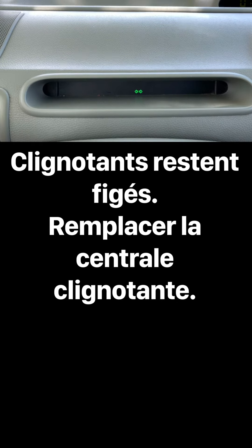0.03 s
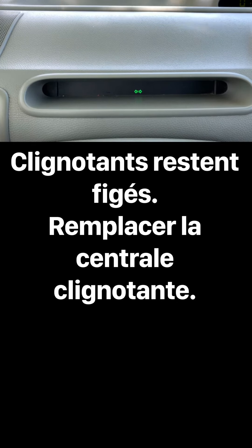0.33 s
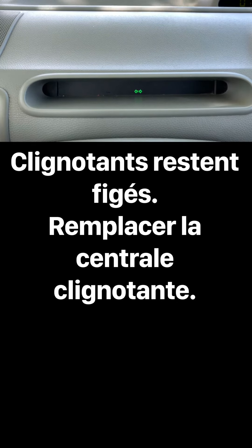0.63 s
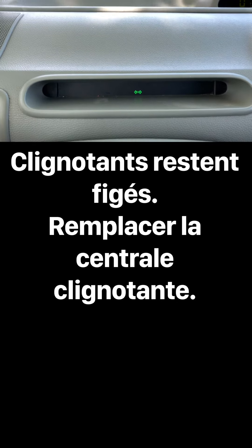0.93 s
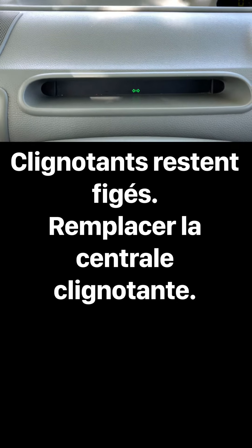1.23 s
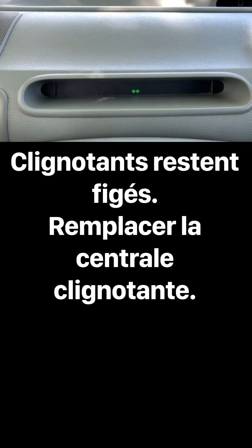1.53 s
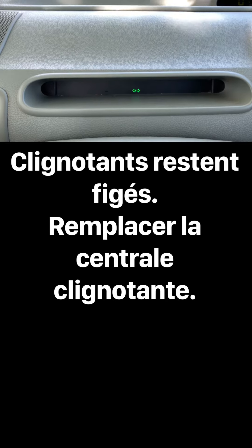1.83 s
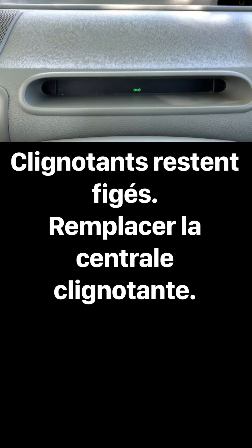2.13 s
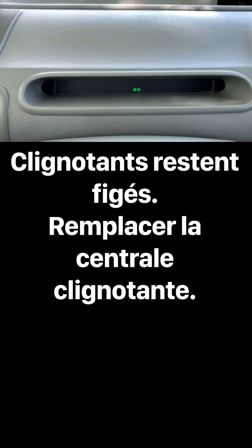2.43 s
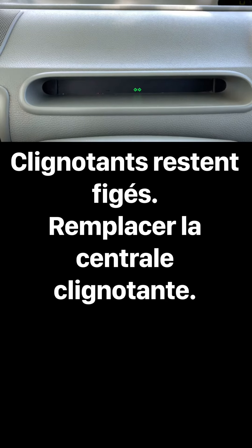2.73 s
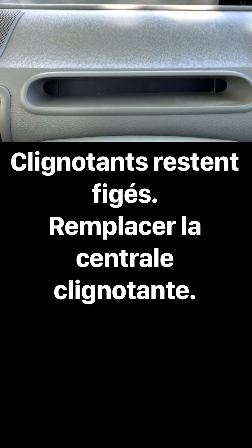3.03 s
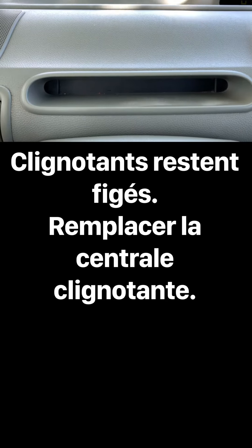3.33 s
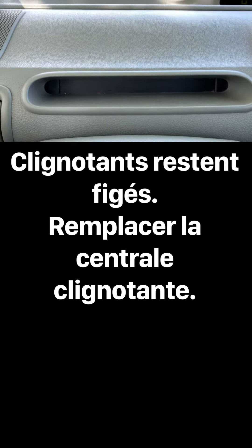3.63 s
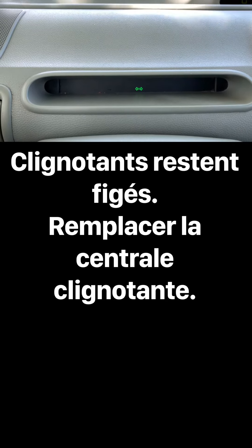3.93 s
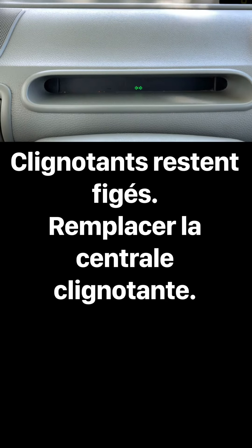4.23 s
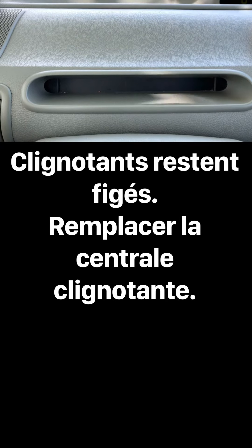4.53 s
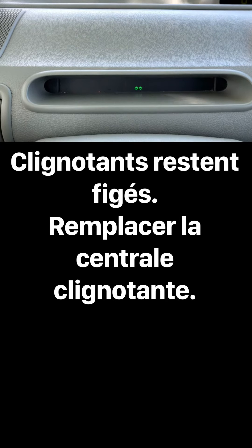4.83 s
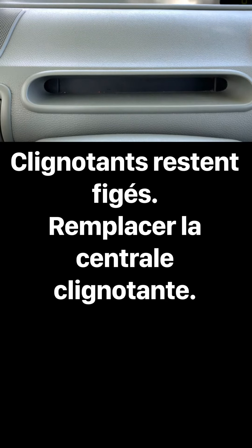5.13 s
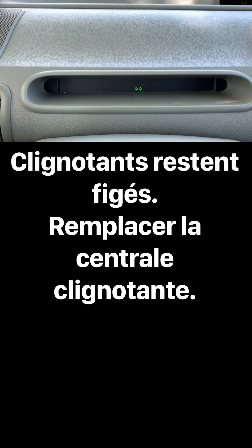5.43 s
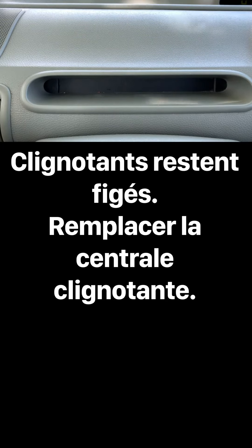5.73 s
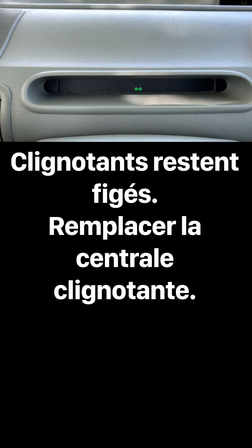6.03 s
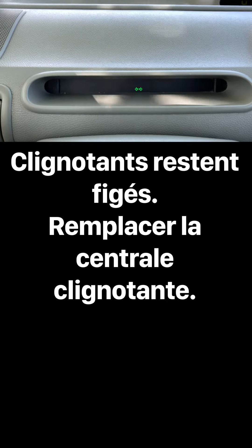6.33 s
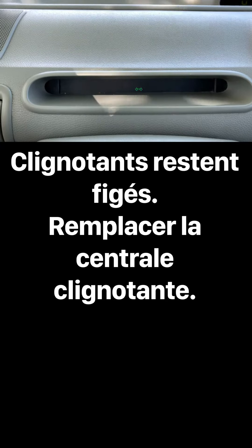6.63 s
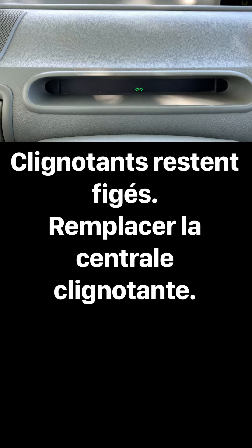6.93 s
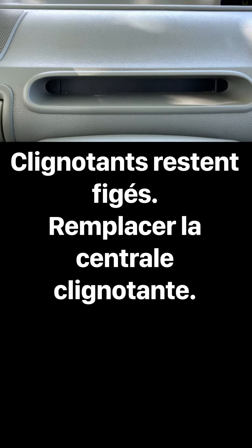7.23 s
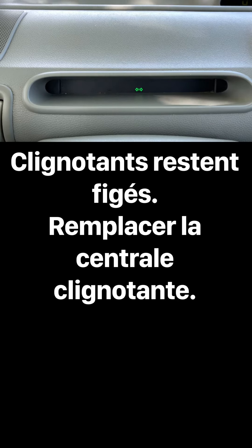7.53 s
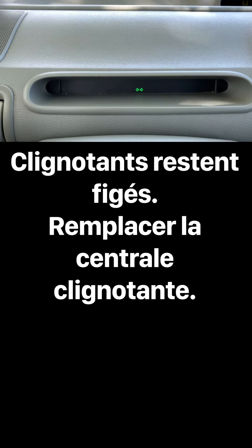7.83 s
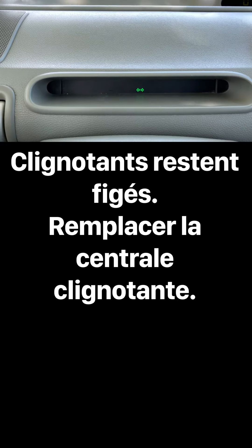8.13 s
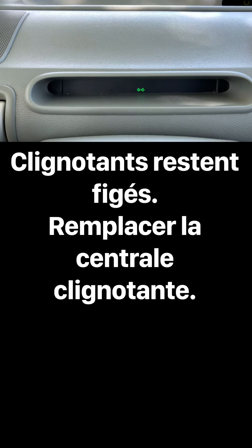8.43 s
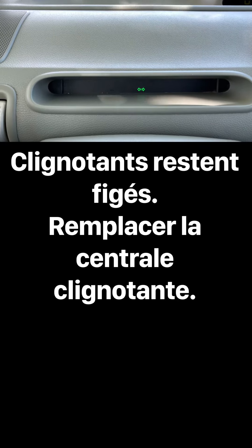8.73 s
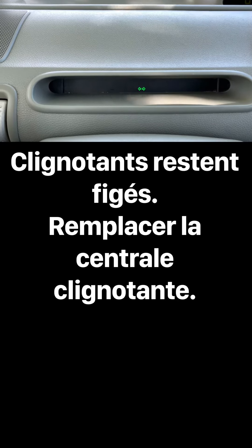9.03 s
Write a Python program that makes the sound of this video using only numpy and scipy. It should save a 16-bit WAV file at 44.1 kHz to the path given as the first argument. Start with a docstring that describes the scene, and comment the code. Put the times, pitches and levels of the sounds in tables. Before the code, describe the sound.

Inside a parked car, an engine idles with a low hum and a faint belt swish. A plastic dashboard button slides briefly and snaps loudly, then snaps again about a second later. A quieter flasher relay ticks on and off five times, clicks once more and stops, leaving the idle. A few soft trim knocks fall in between. Everything is heard from the driver's seat, close and dry.

```python
"""A dashboard hazard button slides in and snaps, then snaps again about a second later, in a parked car.
Behind the plastic the flasher relay ticks on and off five times, pulls in once more and sticks.
Small trim knocks fall in between; each hit rings plastic or metal, and the padded cabin keeps it short.
Underneath, a four-cylinder engine idles: a low boom, a fan hum, faint firing ticks, a swishing belt."""
import sys
import numpy as np
from scipy import signal
from scipy.fft import rfft, irfft
from scipy.io import wavfile
from scipy.ndimage import uniform_filter1d

SR = 44100
rng = np.random.default_rng(int(sys.argv[2]) if len(sys.argv) > 2 else 0)


def bounce(signal):
    """Save signal as a 16-bit WAV file at the path given by the first command-line argument."""
    frames = np.transpose(np.atleast_2d(signal))
    limited = np.clip(frames, -1, 1)
    pcm = np.round(limited * 32767).astype(np.int16)
    wavfile.write(sys.argv[1], SR, pcm)


N = 404397

# stereo image of the cabin, how alike the two sides are: freq_hz, correlation
STEREO_LIKENESS = [(60, 0.92), (200, .9), (380, 0.56), (700, 0.38), (1300, 0.77), (2500, 0), (4500, 0),
                   (8000, 0.92), (16000, 1)]
# pan of the dashboard, which radiates its low mids to the left: freq_hz, left_minus_right_db
DASH_PAN = [(130, 7), (230, 1), (400, 0.5), (600, 11), (900, 1.5), (1400, 3.5), (2200, -1.5), (5000, -1),
            (9000, -0.5)]

# tones of the engine boom: multiple_of_firing_rate, rms_level_db
ENGINE_ORDERS = [(1, -48.5), (2, -39.5), (2.25, -54), (2.5, -50), (3, -47), (4, -57.5), (5, -52),
                 (6, -51.5), (10, -60.5)]
# bed of rumble and air in the cabin: freq_hz, level_db_per_hz
CABIN_EQ = [(20, -84), (40, -68.5), (62, -60.5), (90, -66.5), (130, -65.5), (175, -65), (225, -74),
            (350, -79), (750, -87), (1250, -95.5), (1750, -106), (2200, -112), (4500, -117), (8000, -121),
            (11500, -120), (16000, -124)]
# air resonances and dead spots of the cabin: freq_hz, width_hz, gain_db
CABIN_PEAKS = [(269, 45, 6), (370, 21, -7.5), (432, 45.7, 13), (665, 70, 3.5), (749, 110, 8.5),
               (861.4, 92, -9.5), (1006, 230, 4), (1229, 73, 5), (1510, 260, -4.5), (1610, 36, 16.5)]
# muffled swish of the belt: freq_hz, gain_db
BELT_EQ = [(500, -0.5), (720, 11.5), (900, -4.5), (1200, -3.5), (1380, -18.5), (1600, -2.5), (1850, -8.5),
           (2200, -19), (3200, -20), (4400, -29), (7000, -45.5)]
# resonances in that swish: freq_hz, width_hz, gain_db
BELT_PEAKS = [(1465, 20, 2.77), (1550, 70, 4), (1830, 60, 4), (2113, 62, 5), (2920, 70, 7),
              (3120, 120, 3.6)]
# engine ticks coming through the bulkhead: freq_hz, gain_db
ENGINE_TICK_EQ = [(900, -19.5), (1600, -0.5), (2300, -0.5), (3200, -3.5), (4600, -6.5), (8000, -32)]
# metal parts that ring with them: freq_hz, width_hz, gain_db
ENGINE_TICK_PEAKS = [(1587, 46, 6.5), (1850, 61, 6), (2540, 91, 9), (2850, 150, 7), (3052, 62, 6.5),
                     (3677, 140, 5)]

# knocks of the button and trim: start_s, level_db, treble_edge_db, t60_s, dash_thud_db, hollow_panel_db
KNOCKS = [(0.891, -47, -6, 0.015, -60, -50), (1.0188, -45, 15, 0.033, -45, -40.5),
          (2.6874, -49, -15, 0.072, -61, -46), (2.752, -47, -6, 0.025, -39, -39.5),
          (3.0372, -45, -7, 0.087, -44.5, -47), (3.6762, -40, 9, 0.034, -45, -52),
          (3.8839, -43.5, -13, 0.11, -34.5, -41), (3.9077, -38.5, -19, 0.028, -32, -44),
          (7.3465, -45, -20, 0.047, -39, -43), (7.4215, -57, -3, .05, -50, -43),
          (7.4466, -45, 2, 0.041, -31, -34)]
# dense ring of a knock: freq_hz, gain_db
KNOCK_EQ = [(200, 5.5), (700, 3), (1300, 7.5), (2300, 0.5), (3300, -1), (4500, -4.5), (7000, -12.5),
            (11000, -18.5), (16000, -25.5)]
# a faint brush, then the button sliding in its guide: peak_s, level_db, attack_s, hold_s, fade_db_per_s
RUBS = [(0.95, -63, 0.097, 0.0052, 187), (2.588, -43, 0.011, 0.032, 248)]
# hiss of the sliding button: freq_hz, gain_db
SLIDE_EQ = [(900, -20), (1500, -11.5), (1850, 1.5), (2700, -2.5), (3300, -9), (4600, -4), (5400, -11.5),
            (7400, -7), (8200, -14), (10500, -6), (12300, -8), (13600, -15.5), (15500, -12)]
# resonances of the rubbed plastic: freq_hz, width_hz, gain_db
SLIDE_PEAKS = [(1983, 250, 3), (2730, 200, 5.5), (3773, 200, 8.5), (4530, 300, 7), (7350, 300, 4),
               (9600, 250, 5.5)]

# latch contacts within the press snap and the release snap: offset_ms, gain_db
PRESS_BOUNCES = [(-6.5, -20.5), (-2, -4.5), (3, -2.5), (1, -5), (15.5, -3), (13.5, -2), (22.5, -10.5)]
RELEASE_BOUNCES = [(-1, -25.5), (1.2, 8.5), (1.73, -10.5)]
# dense ring of the button in its panel: freq_hz, press_gain_db, release_gain_db
BUTTON_EQ = [(90.8, -1, 1), (169.6, 0.5, 7), (364, -5.5, -2), (646, 0, 1.5), (934.3, -6, -19.5),
             (1381, -2.5, -5.5), (2090, -1, 2.5), (3006, -3, -8.5), (4364, -0.5, -4.5), (5400, -9.5, -10.5),
             (7100, -9.5, -5.5), (9930, -12.5, -10.5), (13600, -16, -13.5), (15470, -20.5, -13)]
# clear modes of the button and dashboard: pitch_hz, t60_s, press_gain_db, release_gain_db
BUTTON_MODES = [(133.4, 0.25, -3, 3.5), (175, 0.12, -11, 0), (225.3, 0.085, 3, 1), (527.2, 0.065, -1.5, -9),
                (630, 0.026, -3.5, -7), (697, 0.024, -1.5, 5.5), (751.6, 0.11, -4.5, -8.5),
                (1206.5, .06, -8.5, -15.5), (1270, 0.067, -0.5, -11), (1449, .07, -4.5, -18),
                (1764, .065, -10, -11.5), (2016, .06, -3, -13.5), (2135, .055, -18, -3),
                (2180, 0.047, -3.5, -4), (2452, 0.082, -9.5, -9.5), (2821, 0.093, -1, -16),
                (3110, 0.08, -13, -13), (3262, .07, -10, -13), (3660, .06, -5, -5.5),
                (4202, .065, -6, -24.5), (4336, 0.071, -5, -14), (4470, 0.053, -7.5, -13),
                (4700, 0.069, -10.5, -8.5), (5700, 0.09, -9.5, -21), (6503, 0.066, -20, -9),
                (7135, .03, -14, -1.5)]
# hard crack as the latch lets go: freq_hz, gain_db
CRACK_EQ = [(1000, -17.5), (4000, -12.5), (7000, 0), (11000, 2.5), (15500, -6)]

# the relay pulls its armature in, lamps on: start_s, level_db
PULL_INS = [(3.6437, -36), (4.5708, -38), (5.2057, -37.5), (5.9686, -38), (6.6169, -37), (7.2963, -37)]
# the relay lets go, lamps off: start_s, level_db
DROP_OUTS = [(4.2789, -38.5), (4.911, -38.5), (5.674, -39.5), (6.3646, -39.5), (7.0301, -39.5)]
# armature contacts within one pull-in and one drop-out: offset_ms, gain_db
PULL_BOUNCES = [(-5, -10.5), (1.2, -6), (4.5, -17.5)]
DROP_BOUNCES = [(-4.5, -4.5), (6, -10), (15, -4), (-2, -1)]
# dense ring of the relay case: freq_hz, pull_gain_db, drop_gain_db
RELAY_EQ = [(498, -8, 7.5), (910, -2.5, 5), (1490, -14.5, -1.5), (3120, -7.5, -1.5), (4050, -16, -13),
            (4890, -12, -11), (5910, -12, -7), (6700, -14.5, 6), (7800, -7.5, -24.5), (9100, -23, -14),
            (10730, -12, -8), (13140, -6.5, -4), (14380, -20, -22), (15430, -21.5, -10)]
# clear modes of the relay: pitch_hz, t60_s, pull_gain_db, drop_gain_db
RELAY_MODES = [(787, 0.084, -1.5, -19), (836, 0.091, -6.5, 6.5), (987, .1, -12.5, -18),
               (1094, 0.079, -10, 1), (1200, 0.086, -9.5, -2), (1250, 0.08, -8, -1), (1526, 0.045, -23, -7),
               (2000, .05, -20, -14), (2410, 0.062, -12, -8), (2739, .04, -6, -16), (2788, 0.091, -2, 4),
               (2840, 0.047, -18, -26), (3265, 0.055, -9.5, -12), (3600, .05, -4, -18),
               (3646, 0.1, -3.5, -3), (4820, .05, -11, -25), (5980, 0.07, -5.5, -8),
               (6040, 0.066, -6.5, 14.5), (6350, .05, -11.5, -8), (6555, .05, -14.5, -2),
               (6970, 0.041, -10.5, 4), (7410, .04, -10.5, -14), (7980, .045, -3, 2.5), (8462, .04, -9, 2),
               (8950, .04, -1, -8), (11547, 0.032, -2.5, -11), (12200, .04, -2, 0), (13700, .04, 3, -2),
               (13030, 0.033, 3, -9)]

FIRING_HZ = 25.19
LEFT_LAG_S = .000185
PRE_ROLL_S = .008  # room for contacts that land ahead of a hit's cue
HIT_TIME_S = np.arange(SR // 4) / SR - PRE_ROLL_S


def undb(db):
    """Decibels to gain."""
    return 10 ** (np.asarray(db) / 20)


def unit(x):
    """Scale to unit energy."""
    return x / np.sqrt(np.sum(x ** 2))


def curve(table, hz, column=1):
    """A table column drawn as a curve over log frequency."""
    table = np.asarray(table, float)
    return np.interp(np.log(np.maximum(hz, 1)), np.log(table[:, 0]), table[:, column])


def bells(peaks, hz):
    """Boost or cut in dB from a set of resonances."""
    return sum(db / (1 + (2 * (hz - centre) / width) ** 2) for centre, width, db in peaks)


def drift(rate_hz):
    """Smooth random modulation with a spread near 1."""
    step = int(SR / rate_hz)
    return uniform_filter1d(np.repeat(rng.standard_normal(N // step + 1), step), step)[:N]


def decay(t, rise_s, t60):
    """An envelope that builds from t = 0 and dies away."""
    t = np.maximum(t, 0)
    return (1 - np.exp(-t / rise_s)) * np.exp(-np.log(1000) * t / t60)


def stereo_spectrum(size):
    """Frequencies and spectra of mid/side white noise, the left channel a touch late."""
    hz = np.arange(size // 2 + 1) * SR / size
    mid, side = rfft(rng.standard_normal((2, size)))
    alike = np.clip(curve(STEREO_LIKENESS, hz), -1, 1)
    mid, side = mid * np.sqrt((1 + alike) / 2), side * np.sqrt((1 - alike) / 2)
    return hz, np.array([(mid + side) * np.exp(-2j * np.pi * hz * LEFT_LAG_S), mid - side])


def shaped_noise(eq, peaks):
    """Stereo noise through an EQ curve and its resonances, at unit rms."""
    hz, spectrum = stereo_spectrum(N)
    noise = irfft(spectrum * undb(curve(eq, hz) + bells(peaks, hz)), N)
    return noise / noise.std()


def dash_pan(hz):
    """Left and right gain of a dashboard sound."""
    return undb(curve(DASH_PAN, hz) * np.array([[1], [-1]]) / 2)


def place(out, cue_s, db, hit):
    """Drop a hit on its cue, with its loudest 2 ms at the given level."""
    start = int((cue_s - PRE_ROLL_S) * SR)
    loudest = np.sqrt(uniform_filter1d(np.mean(hit ** 2, axis=0), SR // 500).max())
    out[:, start:start + hit.shape[1]] += hit * undb(db) / loudest


def dense_ring(eq, bounces, t60, tail_db, tail_t60, column=1):
    """Countless overlapping modes: a crack and a cabin tail per contact, with t60s given at 3 kHz."""
    hz, spectrum = stereo_spectrum(len(HIT_TIME_S))
    gain = undb(curve(eq, hz, column))
    dulling_db_per_ms = 0.12  # later contacts are softer and lose their treble
    out = 0
    for centre in np.geomspace(90, 16000, 32):
        band_gain = gain * (np.abs(np.log2((hz + 1) / centre)) < 1 / 8)  # a quarter octave wide
        band = irfft(spectrum * band_gain, len(HIT_TIME_S))
        stretch, rise_s = (3000 / centre) ** .25, 0.00036 + 0.66 / centre  # lows bloom late and hang on
        treble_share = curve([(3000, 0.053), (10000, 0.95)], centre)
        power = 0
        for ms, db in bounces:
            t = HIT_TIME_S - ms / 1000
            strength = undb(db - dulling_db_per_ms * ms * treble_share)
            crack = decay(t, rise_s, t60 * stretch)
            tail = undb(tail_db) * decay(t, rise_s, tail_t60 * stretch)
            power += strength ** 2 * (crack ** 2 + tail ** 2)
        out += unit(band * np.sqrt(power)) * np.linalg.norm(band_gain) * dash_pan(centre)
    return unit(out)


def mode_rings(modes, build_cycles):
    """One decaying sine per mode; reflections put left and right out of step."""
    rings = []
    for (hz, t60, *_), (phase, skew) in zip(modes, rng.uniform(-np.pi, np.pi, (len(modes), 2))):
        alike = curve(STEREO_LIKENESS, hz)
        phases = phase + np.array([[-2 * np.pi * hz * LEFT_LAG_S * alike], [.7 * skew * (1 - alike) ** 2]])
        envelope = decay(HIT_TIME_S, 0.00073 + build_cycles / hz, t60)
        rings.append(unit(np.sin(2 * np.pi * hz * HIT_TIME_S + phases) * envelope * dash_pan(hz)))
    return np.array(rings)


def clear_ring(modes, column, build_cycles):
    """The pitched body of a hit: an object's modes sounding together after one blow."""
    gains = undb(np.array(modes)[:, column])
    return unit(np.tensordot(gains, mode_rings(modes, build_cycles), axes=1))


def idle():
    """Engine orders and a fan boom through the body; the cabin noise throbs with the firings."""
    t = np.arange(N) / SR
    firing_phase = 2 * np.pi * np.cumsum(FIRING_HZ * (1 + .003 * drift(1.465))) / SR
    skew_rad = .12 * np.array([[-1], [1]])  # the boom reaches the right side first
    fan_hz, fan_rms_db = 68.76, -42
    boom = undb(fan_rms_db + 1.383 * drift(3.052)) * np.sin(2 * np.pi * fan_hz * t + skew_rad)
    for multiple, db in ENGINE_ORDERS:
        gain = undb(db + 2.2 * drift(10))
        boom += gain * np.sin(multiple * firing_phase + skew_rad + rng.uniform(0, 2 * np.pi))
    hz, spectrum = stereo_spectrum(N)
    cabin = spectrum * undb(curve(CABIN_EQ, hz) + bells(CABIN_PEAKS, hz)) * np.sqrt(SR / 2)
    # the clatter sits mostly in the mids, each octave swelling on its own
    clatter_share = curve([(150, 0.54), (400, 1), (3000, 1), (7000, 0.061)], hz)
    steady = irfft(cabin * (1 - clatter_share), N)
    throb = undb(1.5 * np.sin(2 * firing_phase) + 0.86 * np.sin(3 * firing_phase) + 0.78 * drift(9))
    octave = np.round(np.log2(np.clip(hz, 250, 4000) / 250))
    clatter = sum(undb(0.894 * drift(12)) * irfft(cabin * clatter_share * (octave == k), N)
                  for k in np.unique(octave))
    lean_left = undb([[.6], [-.6]])
    return np.sqrt(2) * boom + steady + lean_left * throb * clatter


def belt(turn_s=.2885, first_swish_s=.13, swish_db=-59, dip_db=4):
    """The drive belt swishes once a turn, muffled by the bulkhead."""
    t = np.arange(N) / SR
    swish = shaped_noise(BELT_EQ, BELT_PEAKS)
    dip = np.sin(np.pi * (t - first_swish_s) / turn_s) ** 2
    return swish * undb(swish_db - dip_db * dip + 0.2 * drift(18))


def engine_ticks(gain_db=-72, flutter_db=2.5, swell_db=1.2):
    """Each firing leaks through the bulkhead as a faint metallic tick, uneven and coming in waves."""
    since_firing_s = np.arange(N) / SR % (1 / FIRING_HZ)
    rattle = shaped_noise(ENGINE_TICK_EQ, ENGINE_TICK_PEAKS)
    gain = undb(gain_db + flutter_db * drift(28) + swell_db * drift(3.2))
    return rattle * decay(since_firing_s, rise_s=.003, t60=.12) * gain


def trim_knocks(plastic_ring_db=-10.5):
    """Light knocks, dull or sharp, each layered with plastic ring, hollow panel and dashboard thud."""
    out = np.zeros((2, N))
    hz, eq_db = np.transpose(KNOCK_EQ)
    dash = [mode for mode in BUTTON_MODES if mode[0] < 400]
    panel = [mode for mode in BUTTON_MODES if 400 <= mode[0] < 1000]
    plastic = [mode for mode in BUTTON_MODES if 1000 <= mode[0] < 3000]
    for start_s, db, edge_db, t60, thud_db, panel_db in KNOCKS:
        eq = np.column_stack([hz, eq_db + curve([(2500, 0.0039), (9000, edge_db)], hz)])
        place(out, start_s, db, dense_ring(eq, [(0, 0)], t60=t60, tail_db=-17.5, tail_t60=0.21))
        place(out, start_s, db + plastic_ring_db, clear_ring(plastic, column=2, build_cycles=2.5))
        place(out, start_s, panel_db, clear_ring(panel, column=2, build_cycles=1.8))
        place(out, start_s, thud_db, clear_ring(dash, column=3, build_cycles=1.6))
    return out


def button_slide(attack_range_db=21, treble_fade_ratio=1.5, grain_hz=440):
    """Plastic rubs on plastic: a grainy rasp rings the button, swells, holds and dulls as it fades."""
    t = np.arange(N) / SR
    hz, spectrum = stereo_spectrum(N)
    spectrum *= undb(curve(SLIDE_EQ, hz) + bells(SLIDE_PEAKS, hz))
    rasp = irfft(spectrum, N)
    treble = irfft(spectrum * curve([(5000, 0.0041), (9000, 0.9)], hz), N)
    out = 0
    for peak_s, db, attack_s, hold_s, fade_db_per_s in RUBS:
        swell_db = attack_range_db * np.minimum(t - peak_s, 0) / attack_s
        fade_db = fade_db_per_s * np.maximum(t - peak_s - hold_s, 0)
        fading = (rasp - treble) * undb(-fade_db) + treble * undb(-treble_fade_ratio * fade_db)
        out += undb(db + swell_db) * fading
    return out / rasp.std() * undb(drift(grain_hz))


def dry_tick():
    """One tiny tick, left of centre, with no ring at all."""
    out = np.zeros((2, N))
    snap = decay(HIT_TIME_S, rise_s=.00001, t60=0.00057)
    place(out, cue_s=1.387, db=-51.5, hit=np.array([snap, 0.64 * snap]))
    return out


def button_snaps(press_ring_db=0.5, release_ring_db=2.5, crack_db=-3):
    """The latch snaps twice and shakes the dashboard panel; it lets go with a hard, bright crack."""
    out = np.zeros((2, N))
    press = dense_ring(BUTTON_EQ, PRESS_BOUNCES, t60=0.062, tail_db=-31, tail_t60=0.2, column=1)
    release = dense_ring(BUTTON_EQ, RELEASE_BOUNCES, t60=0.055, tail_db=-30, tail_t60=.22, column=2)
    release += undb(crack_db) * dense_ring(CRACK_EQ, [(0.0013, 0)], t60=0.027, tail_db=-34, tail_t60=0.1)
    press += undb(press_ring_db) * clear_ring(BUTTON_MODES, column=2, build_cycles=2.2)
    release += undb(release_ring_db) * clear_ring(BUTTON_MODES, column=3, build_cycles=4)
    place(out, cue_s=2.9005, db=-8.5, hit=press)
    place(out, cue_s=3.7755, db=-10, hit=release)
    return out


def flasher_relay(mode_spread_db=2.3):
    """Tick and tock: each armature stroke rings the same modes in a new mix, with some fresh rattle."""
    out = np.zeros((2, N))
    tick = lambda: dense_ring(RELAY_EQ, PULL_BOUNCES, t60=0.0032, tail_db=-8, tail_t60=0.1, column=1)
    tock = lambda: dense_ring(RELAY_EQ, DROP_BOUNCES, t60=0.052, tail_db=12, tail_t60=0.1, column=2)
    _, _, pull_db, drop_db = np.transpose(RELAY_MODES)
    rings = mode_rings(RELAY_MODES, build_cycles=4.4)

    def play(strokes, contact, modes_db, ring_db, rattle_db):
        case = contact()
        for start_s, db in strokes:
            gains = undb(modes_db + mode_spread_db * rng.standard_normal(len(rings)))
            ring = unit(np.tensordot(gains, rings, axes=1))
            place(out, start_s, db, case + undb(ring_db) * ring + undb(rattle_db) * contact())

    play(PULL_INS, tick, pull_db, ring_db=2, rattle_db=-15)
    play(DROP_OUTS, tock, drop_db, ring_db=4.5, rattle_db=-4)
    return out


def scene():
    """The mix from the driver's seat: engine bed below, dashboard clicks on top."""
    bed = idle() + belt() + engine_ticks()
    return bed + button_slide() + button_snaps() + trim_knocks() + dry_tick() + flasher_relay()


def record(dry):
    """Soft clipping rounds the loudest peaks; a steep low-pass cuts the top at 16 kHz."""
    return signal.sosfilt(signal.ellip(8, .2, 70, 16000, fs=SR, output="sos"), np.tanh(dry))


dry = scene()
out = record(dry)
bounce(out)
```